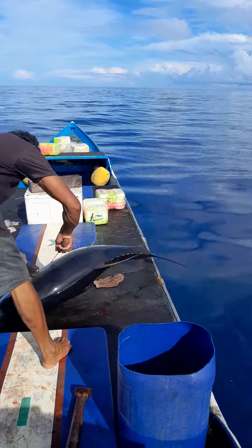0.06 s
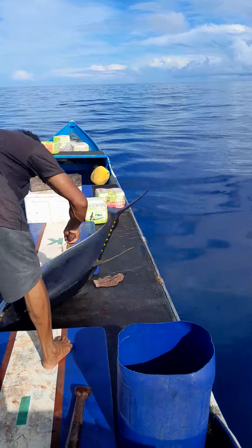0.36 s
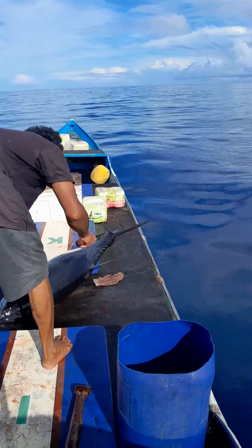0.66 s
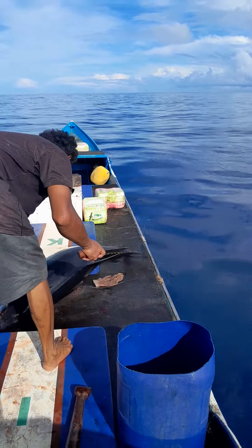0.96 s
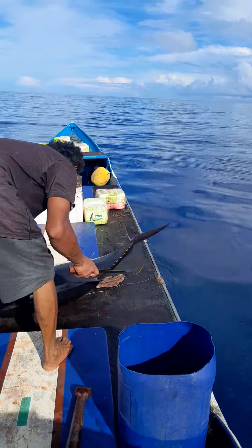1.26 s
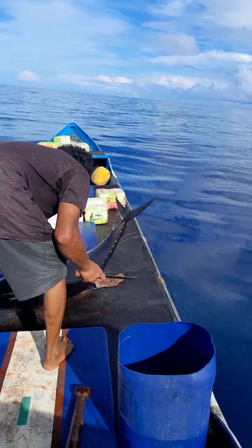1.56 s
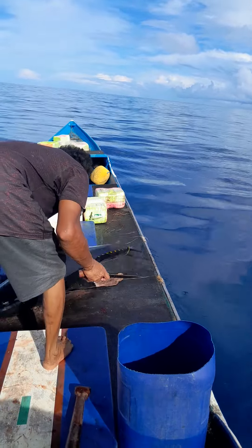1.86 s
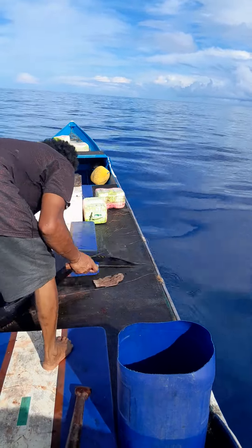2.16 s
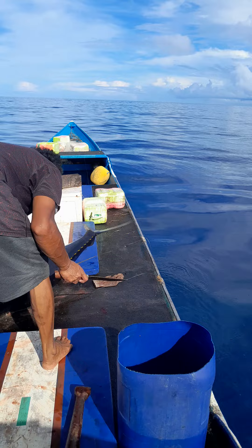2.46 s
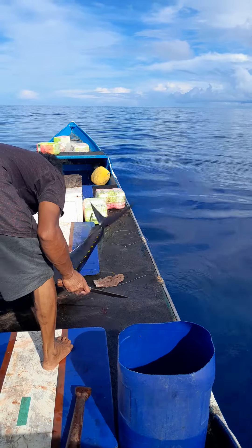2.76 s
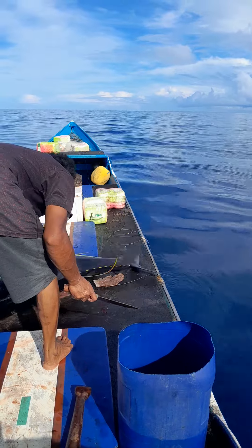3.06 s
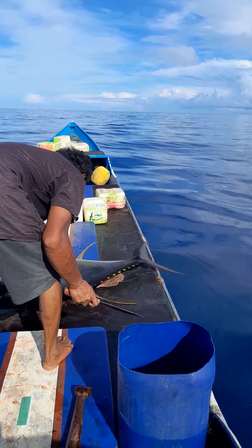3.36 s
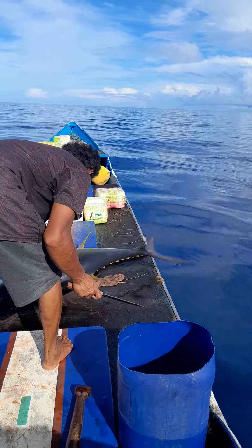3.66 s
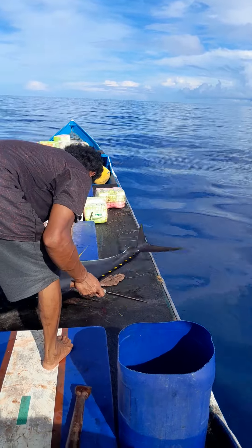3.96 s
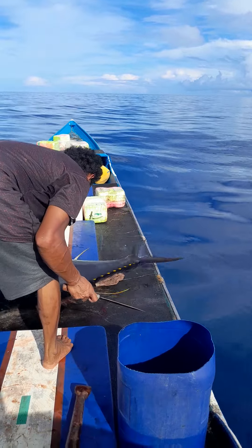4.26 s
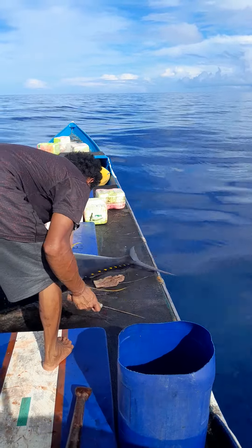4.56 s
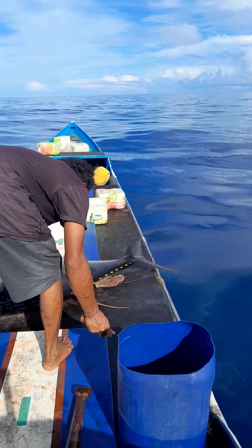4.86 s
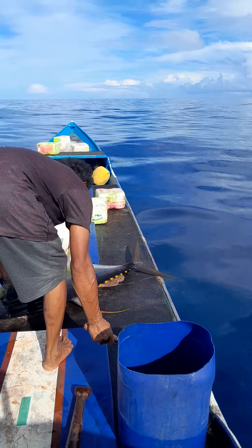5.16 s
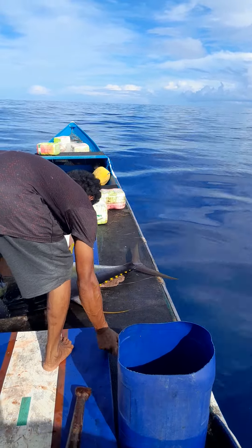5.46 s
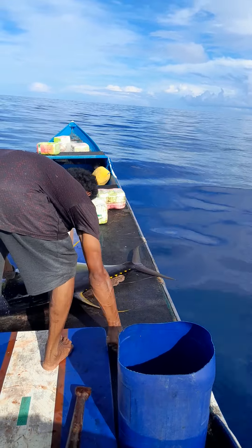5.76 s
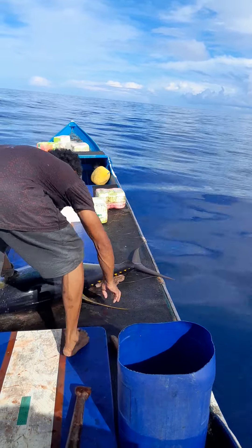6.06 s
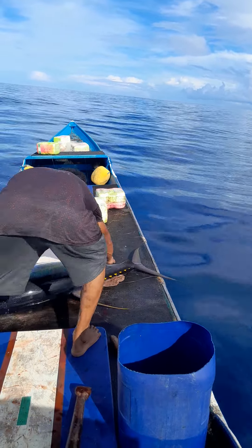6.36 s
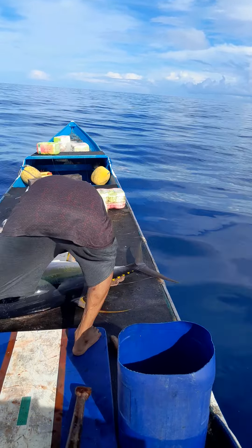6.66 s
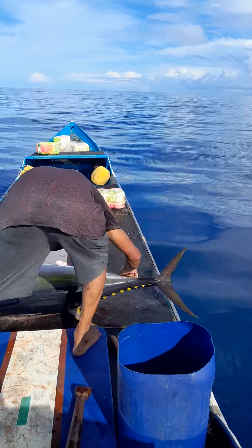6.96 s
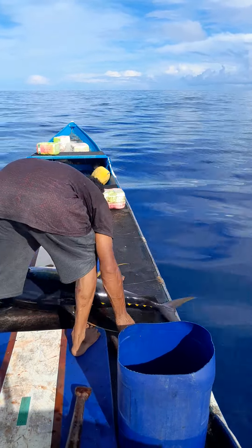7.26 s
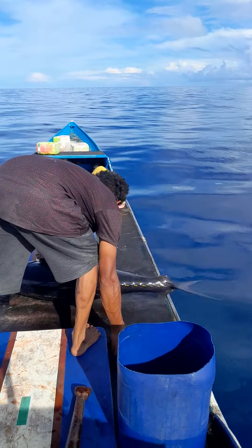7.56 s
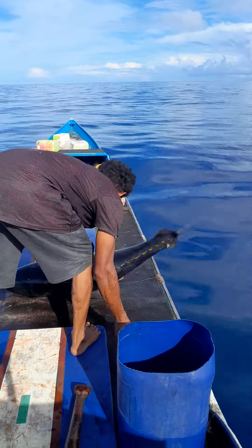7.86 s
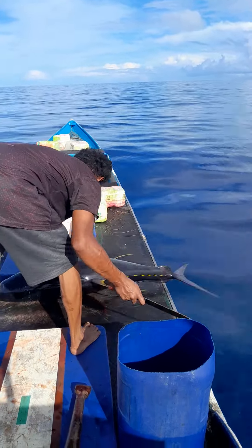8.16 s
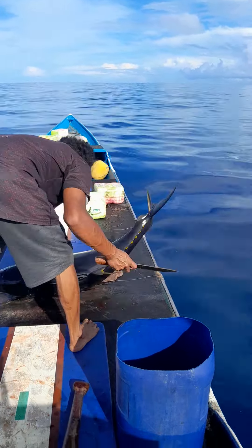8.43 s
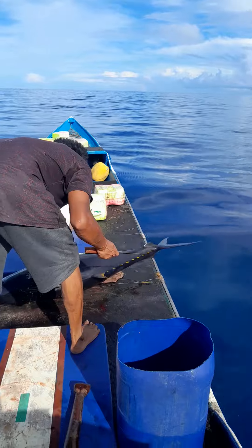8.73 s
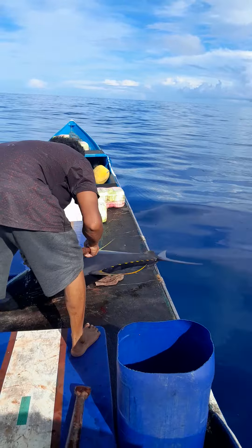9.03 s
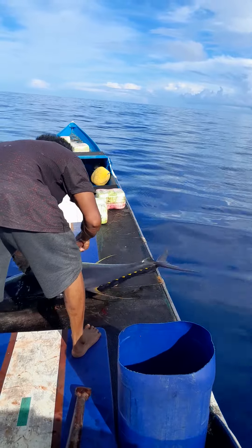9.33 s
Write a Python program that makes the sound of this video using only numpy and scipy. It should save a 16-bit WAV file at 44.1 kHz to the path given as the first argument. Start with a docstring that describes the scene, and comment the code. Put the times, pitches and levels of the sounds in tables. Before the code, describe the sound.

Rapid wet slaps and heavy wooden thumps sound nearby as a big fish flops in a small boat, making the hollow hull boom and shudder. Slippery rubbing and a few tiny squeaks fill the gaps. Midway the fish rests and only some dull knocks are heard, then a sharp tail slap opens a second bout of thrashing. The calm open water is barely audible behind it.

```python
"""Wet slaps, plank knocks and hull booms: a big tuna thrashes on the deck of a small wooden boat.
Its tail cracks on the boards, its flank lands with a knock, and the hollow hull booms under the weight.
Between blows the slimy body slithers, squeaks and shudders, over the faint hush of a calm sea.
Midway it lies still, with a few dull knocks from the deck, then it starts again."""
import sys
import numpy as np
from scipy import signal
from scipy.fft import rfft, irfft, next_fast_len
from scipy.io import wavfile
from scipy.ndimage import uniform_filter1d, map_coordinates

SR = 44100
rng = np.random.default_rng(int(sys.argv[2]) if len(sys.argv) > 2 else 0)


def transcribe(signal):
    """Save signal, clipped to [-1, 1], as a 16-bit WAV file at the path in sys.argv[1]."""
    frames = np.atleast_2d(signal).T
    limited = np.clip(frames, -1, 1)
    pcm = np.round(limited * 32767).astype(np.int16)
    wavfile.write(sys.argv[1], SR, pcm)


N = 422919
TIME_S = np.arange(N) / SR
AGE_S = np.arange(SR // 2) / SR  # time since a blow

# Hull modes. Each row: frequency in Hz, relative level in dB, T60 in seconds.
HULL_MODES = [(45.6, -10.5, 0.14), (55.74, -4, 0.17), (77, -2.5, 0.26), (93, -9, 0.14), (123, 1, 0.08)]
# Wood damping. Each row: frequency in Hz, T60 in seconds.
WOOD_T60 = [(250, 0.29), (600, 0.15), (2000, 0.12)]
# Spectra of planks, hollow corner, skin slap and rub. Each row: frequency in Hz, relative density in dB.
PLANK_SPECTRUM = [(110, -15), (140, -3), (172, -2.5), (207, 4), (260, -0.5), (350, -6.5), (450, -6),
                  (620, -5.5), (1000, -14), (1500, -15.5), (2300, -35.5)]
HOLLOW_SPECTRUM = [(70, -0.5), (95, 11), (170, 3.5), (250, 5.5), (370, -2), (480, -20.5), (640, -13),
                   (1200, -29), (2400, -42)]
SLAP_SPECTRUM = [(200, -21.5), (1300, -11.5), (2000, -6), (3100, -4.5), (6000, -9), (8500, -5),
                 (15500, -17)]
RUB_SPECTRUM = [(60, 3), (250, 10.5), (700, 6.5), (2000, -0.5), (3200, 0), (15500, -6.5)]
# Fits of thrashing. Each row: start and end in seconds, hull shudder in dB, slither in dB.
BOUTS = [(0, 0.25, -38, -48.5), (.3, 3, -31.5, -43), (3.53, 4.1, -41, -47.5), (4.37, 4.76, -40.5, -50),
         (7.45, 7.53, -43, -47), (7.859, 8.2, -41.5, -45.5), (8.4, 8.68, -31, -45.5), (9, 9.31, -29.5, -44)]
# Body drags without a blow. Each row: start in seconds, length in seconds, level in dB.
DRAGS = [(0.052, .04, -42), (2.129, .06, -44.5), (3.132, .08, -40), (3.351, .04, -47), (4.005, .08, -53),
         (4.522, 0.024, -43), (6.985, 0.17, -58), (7.283, 0.067, -55.5), (7.399, .02, -41.5),
         (7.679, .1, -41), (8.264, .1, -50.5), (8.852, .03, -44.5), (9.179, 0.051, -49.5),
         (9.347, .03, -51.5)]
# Skin squeaks. Each row: start and length in seconds, start and end pitch in Hz,
# relative level in dB, step per overtone in dB.
SQUEAKS = [(4.601, 0.018, 2340, 2700, -53.5, -27), (6.961, 0.064, 215, 140, -55, -13),
           (7.001, 0.067, 1300, 1410, -64, -12), (9.284, 0.048, 565, 1050, -47.5, -7)]
# Dry knocks. Each row: start in seconds, level in dB, tilt in dB per octave.
HOLLOW_KNOCKS = [(5.49, -36, 1.5), (5.559, -33, -6), (5.602, -39.5, -7.5), (5.722, -30.5, 1.5),
                 (5.775, -33.5, 1), (6.18, -59.5, 11.5)]
# Weight shifts. Each row: start in seconds, boom level in dB.
BUMPS = [(0.31, -21), (2.24, -23.5), (2.48, -26.5), (3.27, -36), (4.96, -35), (5.39, -60.5), (6.0, -54.5),
         (6.07, -51.5), (5.84, -45), (6.21, -43), (6.28, -47), (6.45, -59.5), (7.075, -46), (8.17, -38),
         (9.233, -28), (9.452, -41.5)]
# Flank landings. Each row: start in seconds, knock in dB, heft (boom over knock) in dB,
# contact time in seconds.
FLOPS = [(0.077, -24.5, -30.5, .013), (0.208, -29, -14, 0.0043), (0.431, -24, -5.5, .016),
         (0.576, -33, -1, 0.0019), (0.635, -22, -1, .004), (0.825, -24.5, -6, .003), (1.022, -21, -5, .015),
         (1.186, -25, -12.5, 0.0065), (1.207, -22, -2.5, .006), (1.535, -22.5, -9, 0.0061),
         (1.63, -25.5, -5, 0.0017), (2.03, -22, -10, 0.0098), (2.387, -24, -8, 0.011),
         (2.558, -26, -5.5, .013), (2.747, -28, -12, .005), (2.822, -25.5, -2, .003),
         (3.528, -30.5, 5, .008), (3.646, -38.5, -7, .005), (3.7, -29, -4.5, .008),
         (3.812, -31, 4.5, 0.0051), (4.668, -32, -6, 0.0018), (4.727, -30, -2.5, .008),
         (7.845, -31, -5.5, 0.0013), (7.948, -29.5, 1.5, .002), (8.111, -29.5, -4.5, .002),
         (8.387, -26.5, -6, 0.0062), (8.486, -31, 5.5, 0.0029), (8.596, -27.5, -5, 0.0088),
         (8.902, -28.5, -11, 0.003), (8.915, -27.5, -22, 0.0098), (8.995, -29, -2.5, 0.0031),
         (9.09, -23, -5, 0.0044)]
# Tail blows. Each row: start in seconds, wet crack in dB, weight on the deck in dB.
TAIL_SLAPS = [(0.213, -34, -32.5), (0.298, -23.5, -23.5), (0.663, -22, -21), (0.866, -22.5, -21),
              (1.381, -23.5, -19.5), (1.715, -25.5, -17), (1.893, -26, -17.5), (2.221, -24.5, -27.5),
              (2.399, -31, -30), (2.923, -27.5, -20), (3.541, -29, -29), (3.952, -30.5, -33),
              (4.143, -25, -29), (4.364, -24, -21), (4.751, -32, -42), (4.955, -38.5, -38),
              (7.442, -22, -21.5), (8.065, -33, -33)]


def amp(db):
    """Decibels to gain."""
    return 10 ** (np.asarray(db) / 20)


def unit(x):
    """Scale to rms 1."""
    return x / np.sqrt(np.mean(x ** 2) + 1e-20)


def burst(x, span_s):
    """Scale a blow to rms 1 over its first span_s."""
    return x / np.sqrt(np.mean(x[..., :int(span_s * SR)] ** 2) + 1e-20)


def along(points, hz):
    """Interpolate (Hz, value) points on a log frequency axis."""
    point_hz, values = np.transpose(points)
    return np.interp(np.log(hz + 1), np.log(point_hz + 1), values)


def add(out, start_s, sound):
    """Mix a sound in at start_s."""
    out[:, round(start_s * SR):][:, :sound.shape[-1]] += sound


def filtered(x, response):
    """Apply a frequency response by FFT."""
    n = x.shape[-1]
    size = next_fast_len(n + SR // 10)
    return irfft(rfft(x, size) * response(np.fft.rfftfreq(size, 1 / SR)), size)[..., :n]


def coloured(x, gain):
    """Minimum-phase filter with the given gain over frequency."""
    def response(hz):
        cepstrum = irfft(np.log(gain(hz) + 1e-6))
        half = len(cepstrum) // 2
        cepstrum[1:half] *= 2
        cepstrum[half + 1:] = 0
        return np.exp(rfft(cepstrum))
    return filtered(x, response)


def wobble(rate_hz, n):
    """Smooth random curve of n samples."""
    knots = rng.standard_normal(int(n * rate_hz / SR) + 2)
    return map_coordinates(knots, [np.arange(n) * rate_hz / SR], mode="nearest")


def spatter(n, rate_hz, depth_db, width):
    """Stereo noise in tiny clumps, as when a water film tears."""
    noise = rng.standard_normal(n) + width * rng.standard_normal((2, n))
    return noise * amp(depth_db * wobble(rate_hz, n))


def press(contact_s):
    """Force of soft flesh landing; peaks at contact_s."""
    u = AGE_S / max(contact_s, 1 / SR)
    return u * np.exp(1 - u)


def calm_sea():
    """Faint hush of open water."""
    return amp(-73.5) * unit(filtered(rng.standard_normal((2, N)), lambda hz: 1 + 900 / (hz + 50)))


def swell(start_s, end_s, rise_db_per_s, fall_db_per_s):
    """Gain that reaches 1 at start_s, holds, and decays after end_s."""
    before_s, after_s = np.maximum(start_s - TIME_S, 0), np.maximum(TIME_S - end_s, 0)
    return amp(-rise_db_per_s * before_s - fall_db_per_s * after_s)


def skin_contact(stuck_db=-4, peel_delay_s=0.066, peel_width_s=0.057, lift_db=-4.5, lift_s=0.018):
    """Rub gain: the skin clings after a blow, peels off, and lifts before the next."""
    landings_s = np.sort([0, N / SR + 1] + [row[0] for row in TAIL_SLAPS + FLOPS])
    coming = np.searchsorted(landings_s, TIME_S, side="right")
    peel = np.exp(-((TIME_S - landings_s[coming - 1] - peel_delay_s) / peel_width_s) ** 2)
    lift = np.exp(-((landings_s[coming] - TIME_S) / lift_s) ** 2)
    return (amp(stuck_db) + peel) * amp(lift_db * lift)


def effort(drag_shudder_db=-5, rest_db=-74.5):
    """Shudder and slither gains from thrashing and dragging."""
    shudder, slither, drags = np.zeros((3, N))
    for start_s, end_s, shudder_db, slither_db in BOUTS:
        bout = swell(start_s, end_s, rise_db_per_s=501, fall_db_per_s=132.5)
        shudder += amp(shudder_db) * bout
        slither += amp(slither_db) * bout
    for start_s, length_s, db in DRAGS:
        drags += amp(db) * swell(start_s, start_s + length_s, rise_db_per_s=602.5, fall_db_per_s=328)
    return shudder + amp(drag_shudder_db) * drags + amp(rest_db), slither * skin_contact() + drags


def squelch(x, depth_db=4):
    """Slime pockets open and close, each a brief resonance in the rub."""
    spectra = signal.stft(x, nperseg=256)[2]
    pockets = uniform_filter1d(rng.standard_normal(spectra.shape[1:]), size=6, axis=0)
    pockets = uniform_filter1d(pockets, size=8, axis=1)
    return signal.istft(spectra * amp(depth_db * unit(pockets)), nperseg=256)[1][:, :N]


def body_slither(gain, pops_per_s=60, dull_hz=3020, tear_db=-58.5):
    """Slimy skin peels and slips in wet ticks; a gentle rub tears no water film and loses treble."""
    pops = (rng.random(N) < pops_per_s / SR) * rng.random(N) ** 2
    peels = signal.fftconvolve(pops, press(contact_s=.003))[:N]
    slips = spatter(N, rate_hz=500, depth_db=3, width=.8) * (amp(2.5 * wobble(30, N)) + 4 * peels)
    bright = unit(coloured(squelch(slips), lambda hz: amp(along(RUB_SPECTRUM, hz))))
    dull = filtered(bright, lambda hz: 1 / (1 + (hz / dull_hz) ** 2))
    tearing = gain / (gain + amp(tear_db))
    return gain * (tearing * bright + (1 - tearing) * dull)


def hull_shudder(gain):
    """The body's weight drives the hull modes at random."""
    def response(hz):
        return sum(amp(db) / (1 + ((hz - mode_hz) * t60_s / 3) ** 2) for mode_hz, db, t60_s in HULL_MODES)
    return gain * unit(filtered(rng.standard_normal(N), response))


def squeaks(jitter=0.044):
    """Stick-slip of wet skin on paint: short, unsteady glides."""
    out = np.zeros(N)
    for start_s, length_s, start_hz, end_hz, db, overtone_db in SQUEAKS:
        progress = np.clip((TIME_S - start_s) / length_s, 0, 1)
        pitch_hz = (start_hz + (end_hz - start_hz) * progress) * (1 + jitter * wobble(280, N))
        phase = 2 * np.pi * np.cumsum(pitch_hz) / SR
        grip = np.sin(np.pi * progress) * amp(3 * wobble(600, N))
        out += 2 * grip * sum(amp(db + k * overtone_db) * np.sin((k + 1) * phase) for k in range(4))
    return out


def deck_spot(x, depth_db):
    """Each spot of the deck favours its own resonances, about a quarter octave wide."""
    ripple_db = depth_db * rng.standard_normal(size=40)
    return filtered(x, lambda hz: amp(map_coordinates(ripple_db, [5 * np.log2(1 + hz / 200)])))


def wood_knock(spectrum, tilt_db_per_oct, contact_s, attack_s=0.00044):
    """Dense, well damped wood modes; a harder blow tilts them toward the treble."""
    def timbre(hz):
        db = along(spectrum, hz) + tilt_db_per_oct * np.log2(np.clip(hz, 330, 1500))
        return amp(db) * hz / (hz + 100) / (1 + (hz / 2600) ** 4)
    modes = deck_spot(spatter(len(AGE_S), rate_hz=300, depth_db=2, width=.25), depth_db=2.5)
    band_hz, frame_s, spectra = signal.stft(modes, SR, nperseg=128)
    decay = amp(-60 * frame_s / along(WOOD_T60, band_hz)[:, None])
    ring = signal.istft(spectra * decay, SR, nperseg=128)[1][:, :len(AGE_S)]
    force = 1 - np.exp(-AGE_S / attack_s) + 0.32 * press(contact_s)
    return burst(coloured(ring * force, timbre), span_s=.04)


def hull_boom(contact_s):
    """Low hull modes, driven a little differently by each blow."""
    hz, db, t60_s = np.transpose(HULL_MODES)[:, :, None]
    strength, detune, phase = rng.standard_normal((3, len(HULL_MODES), 1))
    envelopes = amp(db + 2 * strength - 60 * AGE_S / t60_s)
    modes = envelopes * np.sin(2 * np.pi * hz * (1 + 0.062 * detune) * AGE_S + np.pi * phase)
    attack = 1 - np.exp(-AGE_S / (contact_s + .005))
    return burst(modes.sum(0) * attack, span_s=.08)


def deck_blow(db, heft_db, contact_s):
    """Planks and hull answer together; more heft gives more boom and a duller knock."""
    tilt_db_per_oct = -1.2 - 0.26 * heft_db
    knock = wood_knock(PLANK_SPECTRUM, tilt_db_per_oct, contact_s)
    return amp(db) * (knock + amp(heft_db) * hull_boom(contact_s))


def wet_slap(contact_s, spray_db=-9, spray_t60_s=0.11):
    """Wet skin cracks on the boards; spray and nearby surfaces answer."""
    spray = amp(spray_db - 60 * AGE_S / spray_t60_s + 2.8 * wobble(150, len(AGE_S)))
    spray *= 1 - np.exp(-AGE_S / contact_s)
    film = deck_spot(spatter(len(AGE_S), rate_hz=900, depth_db=3, width=.9), depth_db=1.5)
    splash = film * (press(0.93 * contact_s) + spray)
    return burst(coloured(splash, lambda hz: amp(along(SLAP_SPECTRUM, hz))), span_s=.04)


def hollow_knocks(pan_db=1):
    """Something dry bumps a hollow corner on the right while the fish rests."""
    out = np.zeros((2, N + SR))
    for start_s, db, tilt_db_per_oct in HOLLOW_KNOCKS:
        add(out, start_s, amp(db) * wood_knock(HOLLOW_SPECTRUM, tilt_db_per_oct, contact_s=0.017))
    return out[:, :N] * amp([[-pan_db], [pan_db]])


def weight_bumps(contact_s=0.013, knock_db=-12):
    """Slow, heavy contacts boom in the hull and barely wake the planks."""
    out = np.zeros((2, N + SR))
    for start_s, db in BUMPS:
        boom = hull_boom(contact_s)
        knock = wood_knock(PLANK_SPECTRUM, tilt_db_per_oct=-10.5, contact_s=contact_s)
        add(out, start_s, amp(db) * (boom + amp(knock_db) * knock))
    return out[:, :N]


def flank_flops():
    """The soft flank lands with a woody knock and a small splash that grows with it."""
    out = np.zeros((2, N + SR))
    for start_s, db, heft_db, contact_s in FLOPS:
        splash_db = -22.5 + 0.54 * db
        add(out, start_s, deck_blow(db, heft_db, contact_s) + amp(splash_db) * wet_slap(contact_s))
    return out[:, :N]


def tail_slaps(skim_lead_s=.006, skim_db=-14):
    """The fin tip skims the deck, then the tail cracks down flat."""
    out = np.zeros((2, N + SR))
    for start_s, crack_db, weight_db in TAIL_SLAPS:
        add(out, start_s - skim_lead_s, amp(crack_db + skim_db) * wet_slap(contact_s=0.0023))
        crack = amp(crack_db) * wet_slap(contact_s=.0009)
        boom_db = -18 + 0.42 * weight_db
        add(out, start_s, crack + deck_blow(weight_db, heft_db=boom_db - weight_db, contact_s=0.0016))
    return out[:, :N]


def from_right(x, lag_s):
    """The right channel leads the left by lag_s."""
    return filtered(x, lambda hz: np.exp(1j * np.pi * hz * lag_s * np.array([[-1], [1]])))


def scene(pan_db=.3):
    """Fish and deck slightly right, shifting further right from 5 to 6 s; sea all around."""
    shudder_gain, slither_gain = effort()
    boat = tail_slaps() + flank_flops() + weight_bumps()
    boat += body_slither(slither_gain) + hull_shudder(shudder_gain) + squeaks() + hollow_knocks()
    shift = np.clip(TIME_S - 5, 0, 1)
    placed = (1 - shift) * from_right(boat, lag_s=5e-5) + shift * from_right(boat, lag_s=8e-5)
    return placed * amp([[-pan_db], [pan_db]]) + calm_sea()


def record(dry, low_hz=30, top_hz=16100):
    """Band limit: cuts the deepest rumble and the top treble."""
    return filtered(dry, lambda hz: (1 - np.exp(-(hz / low_hz) ** 4)) / (1 + (hz / top_hz) ** 100))


dry = scene()
out = record(dry)
transcribe(out)
```